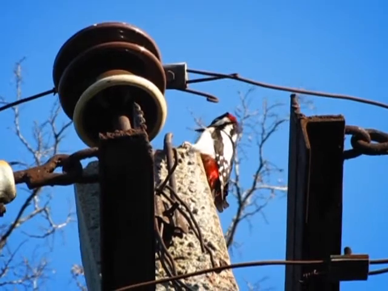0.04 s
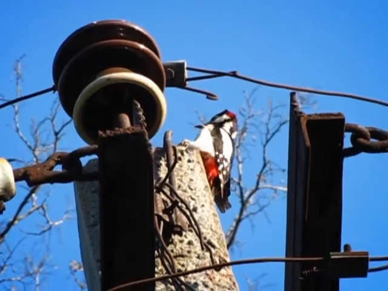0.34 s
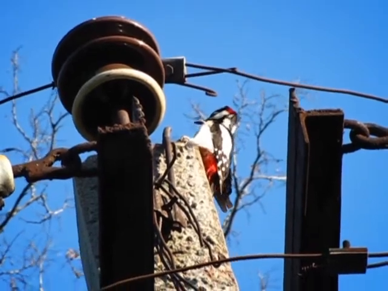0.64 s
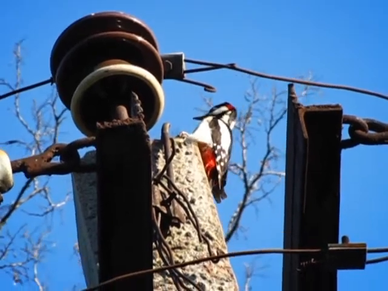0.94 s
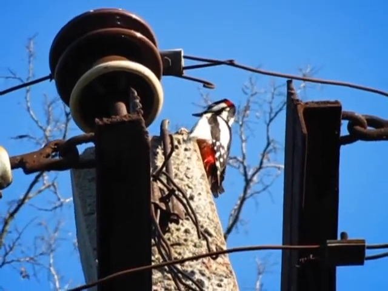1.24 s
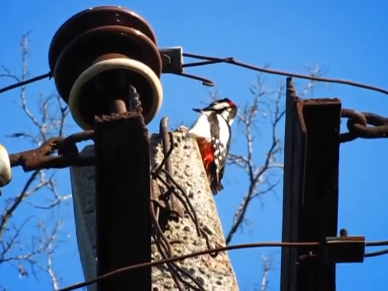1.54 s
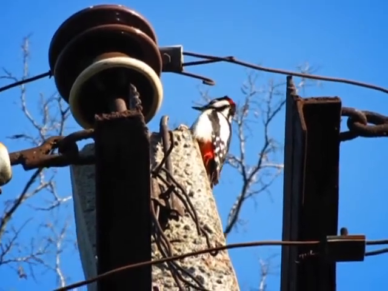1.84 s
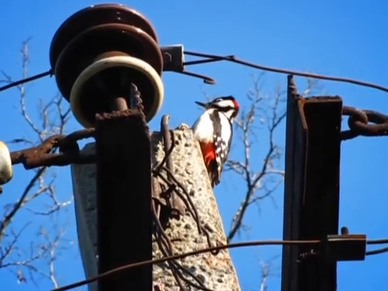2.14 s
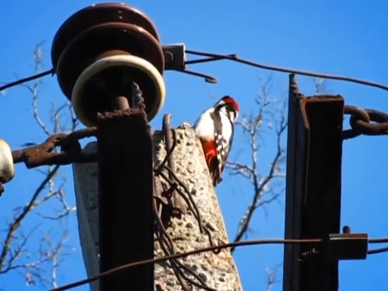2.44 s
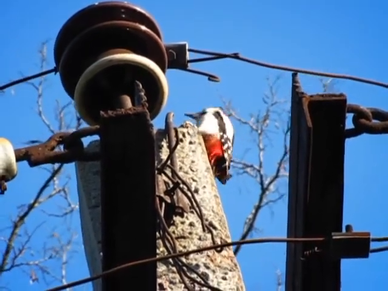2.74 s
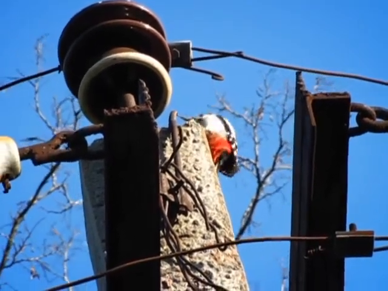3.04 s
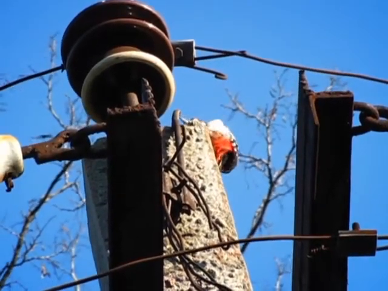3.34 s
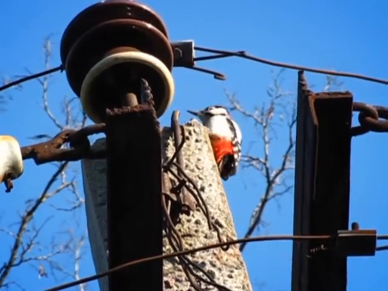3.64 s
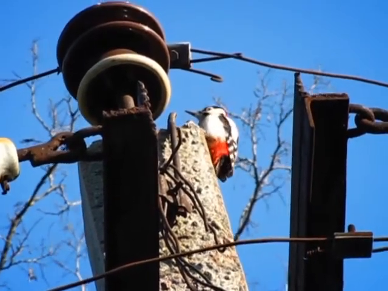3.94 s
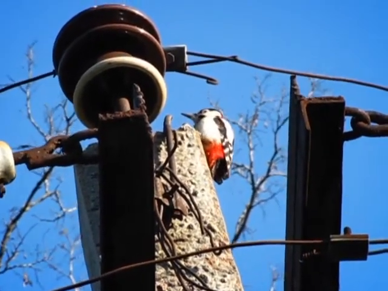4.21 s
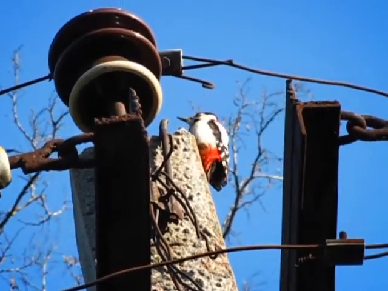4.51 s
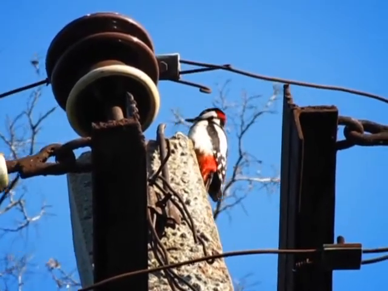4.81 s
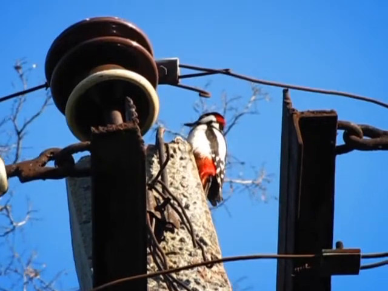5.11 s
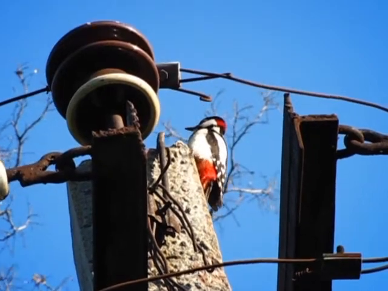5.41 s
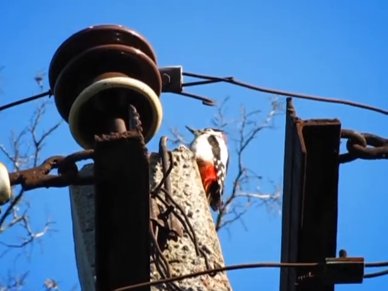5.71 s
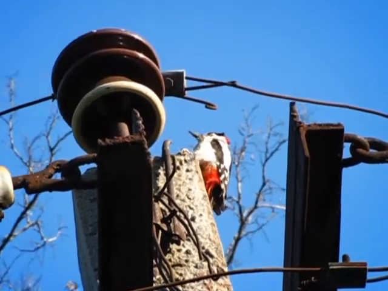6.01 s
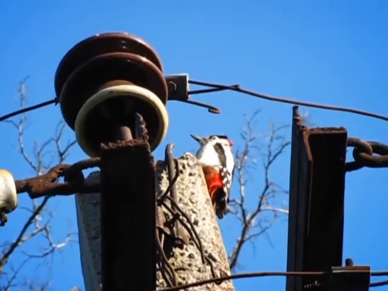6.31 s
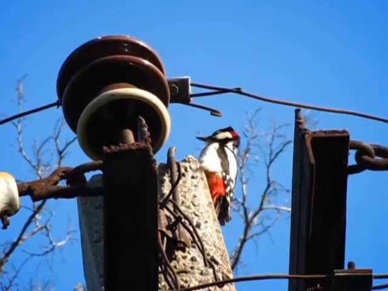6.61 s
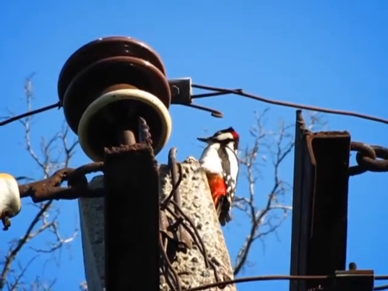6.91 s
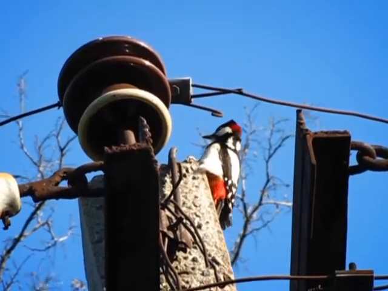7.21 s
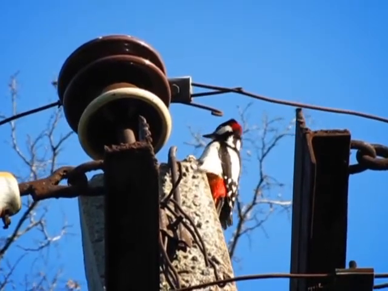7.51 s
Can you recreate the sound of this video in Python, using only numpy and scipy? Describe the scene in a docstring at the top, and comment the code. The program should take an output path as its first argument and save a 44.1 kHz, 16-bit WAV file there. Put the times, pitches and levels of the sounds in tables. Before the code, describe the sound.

Light wind rumbles on the microphone throughout, outdoors, over the low roar of distant traffic and faint, scattered chirps of far birds. From the start until about 2 seconds, a small bird on the right sings four quick phrases, roughly two a second, each made of two high, clear whistles and a short, higher buzz. At about 2.7 seconds, as the traffic swells, a woodpecker drums a single roll on the ironwork of a power-line pole, near the centre. The rapid blows make a dense, ringing metallic clatter that quickens and weakens, ending around 3.6 seconds. Faint hums rise from the fading traffic until about 4.3 seconds. Then the small bird sings five more of the same phrases, until about 6.5 seconds. The wind gusts harder during this song, with a brief low buffet at 4.8 seconds and another gust near 6.4. Wind, traffic and far chirps continue until nearly 8 seconds.

```python
"""Light wind rumbles on the microphone throughout, over distant traffic and the calls of far birds.
From the start a small bird on the right repeats two nearly pure whistles and a frequency-modulated buzz.
At 2.7 s, as the traffic swells, a woodpecker drums one quickening, weakening roll on the ironwork atop
a concrete power-line pole: each impact excites a dense clatter and the iron's ringing modes.
Faint drones rise from the fading traffic, and from 4.3 s the small bird sings again amid stronger gusts."""
import sys
import numpy as np
from scipy import signal
from scipy.fft import rfft, irfft
from scipy.io import wavfile
from scipy.ndimage import uniform_filter1d, map_coordinates

SR = 44100
rng = np.random.default_rng(int(sys.argv[2]) if len(sys.argv) > 2 else 0)


def transcribe(u):
    """Save the signal u as a 16-bit wav file named by the first command-line argument.

    u: samples, shape (n,) or (channels, n), limited to [-1, 1]; the rate is SR.
    q: integer samples, one column per channel.
    """
    v = np.clip(np.atleast_2d(u).T, -1, 1)
    q = np.round(v * 32767).astype(np.int16)
    wavfile.write(sys.argv[1], SR, q)


N = 341775
TIME = np.arange(N) / SR

def gain_of(db):
    """Amplitude ratio of a level in decibels."""
    return 10 ** (np.asarray(db) / 20)

def unit_rms(x):
    """Normalisation to unit mean power."""
    return x / np.sqrt(np.mean(x ** 2) + 1e-20)

def at_frequency(table, hz):
    """Interpolation on a logarithmic frequency axis."""
    table_hz, value = np.transpose(table)
    return np.interp(np.log(hz + 1), np.log(table_hz + 1), value)

def add(mix, start_s, sound):
    """Superposition of a sound on a mix, in place."""
    part = mix[max(round(start_s * SR), 0):][:len(sound)]
    part += sound[:len(part)]

def bell(t, centre, width):
    """Gaussian pulse: 1 at the centre, 1/e one width away."""
    return np.exp(-((t - centre) / width) ** 2)

def coloured(x, spectrum):
    """Spectral shaping by a table of levels, at unit rms."""
    size = x.shape[-1]
    response = gain_of(at_frequency(spectrum, np.fft.rfftfreq(size, 1 / SR)))
    return unit_rms(irfft(rfft(x) * response, size))

def noise_pair(size, correlation):
    """Partially correlated white noise at the two microphone ports."""
    a, b = rng.standard_normal((2, size))
    return np.array([a, correlation * a + np.sqrt(1 - correlation ** 2) * b])

def wander(size, hz):
    """Random fluctuation: low-pass noise of about unit rms."""
    span = max(size, SR // 2)
    rolloff = 1 + (np.fft.rfftfreq(span, 1 / SR) / hz) ** 4
    return unit_rms(irfft(rfft(rng.standard_normal(span)) / rolloff, span))[:size]

def panned(left_db):
    """Constant-power channel gains for a left-minus-right level difference."""
    pair = np.array([gain_of(left_db / 2), gain_of(-left_db / 2)]).reshape(2, -1)
    return pair / np.sqrt((pair ** 2).mean(0))

# Decay among the trees. Each row: frequency in Hz, reverberation time (T60) in seconds.
TREE_DECAY = [(500, 1), (2000, 0.99), (3700, 0.42), (5200, 0.33), (12000, 0.18)]

def tree_reverb(x, correlation, onset_s=0.0061):
    """Reverberation: scattering from trunks and walls leaves a tail that decays faster in the treble."""
    hz, t, bands = signal.stft(noise_pair(SR, correlation), SR, nperseg=256)
    decay = gain_of(-60 * t / at_frequency(TREE_DECAY, hz)[:, None])
    tail = signal.istft(bands * decay * np.minimum(t / onset_s, 1), SR, nperseg=256)[1]
    return signal.fftconvolve(np.atleast_2d(x), tail / np.linalg.norm(tail[0]), axes=1)[:, :N]

# The breeze between gusts. Each row: time in seconds, level in dB.
BREEZE_LEVELS = [(0, -32), (2.9, -34.5), (4.4, -35.5), (7.3, -37.5), (7.75, -42)]
# Gusts. Each row: peak time in seconds, half-width in seconds, level in dB, left minus right in dB.
WIND_GUSTS = [(0.144, 0.044, -27.5, -7), (.58, 0.26, -36, 17), (1.198, 0.13, -30, 16),
              (1.504, 0.1, -32, 16), (2.528, 0.19, -33.5, -34), (4.63, 0.055, -24.5, 12),
              (4.799, 0.034, -15, 0.5), (5.39, 0.091, -29, 18), (5.702, .09, -28.5, 12),
              (6.384, 0.19, -23, 15), (6.783, .24, -28.5, 22), (7.335, 0.087, -34, -20)]
# The wind's rumble. Each row: frequency in Hz, relative spectral density in dB.
WIND_SPECTRUM = [(8, -7.5), (25, -0.5), (45, -1), (65, 2.5), (90, -8), (125, -13.5), (170, -21.5),
                 (300, -35), (800, -53.5), (3000, -99.5)]

def wind(flutter_db=1.3, ceiling=0.5):
    """Turbulent pressure buffets the two ports unequally; the strongest gust saturates softly."""
    flutter = flutter_db * np.array([wander(N, hz=5), wander(N, hz=3.6)])
    breeze_db = np.interp(TIME, *np.transpose(BREEZE_LEVELS)) + flutter
    power = (gain_of(breeze_db) * panned(left_db=3)) ** 2
    for peak_s, width_s, db, left_db in WIND_GUSTS:
        power += (gain_of(db) * panned(left_db)) ** 2 * bell(TIME, peak_s, width_s)
    eddies = coloured(noise_pair(N, correlation=0.59), WIND_SPECTRUM)
    return ceiling * np.tanh(np.sqrt(power) * eddies / ceiling)

# Vehicles. Each row: closest approach in seconds, time to half power in seconds, relative level in dB.
VEHICLE_PASSES = [(.7, 1, -46.5), (3.25, 0.8, -35.5), (6.501, 0.76, -45.5), (7.7, 0.28, -42)]

def road_level(steady_db=-45, steepness=3.18):
    """Incoherent sources add in power: passing vehicles over a steady roar, as a relative level in dB."""
    passing = sum(gain_of(db) ** 2 / (1 + abs((TIME - nearest_s) / half_s) ** steepness)
                  for nearest_s, half_s, db in VEHICLE_PASSES)
    return 10 * np.log10(gain_of(steady_db) ** 2 + passing)

# The far road's roar and the air's hiss. Each row: frequency in Hz, relative spectral density in dB.
ROAR_SPECTRUM = [(60, 7), (150, -2.5), (300, 2), (500, 0.5), (900, -1), (1100, -7.5), (1400, -17.5),
                 (2000, -29.5), (4000, -30.5), (9000, -62)]
AIR_SPECTRUM = [(100, -3.5), (1500, 2), (3000, -1.5), (5000, -3.5), (8000, -10.5), (11000, -13.5),
                (15000, -21)]

def traffic(roar_db=1, tyres_db=-17, brightening=1.65, hiss_db=-60, lag_samples=4):
    """Broadband road noise, slightly left: the tyres' treble grows faster than the roar, over air hiss."""
    road_db = road_level()
    peak_db = road_db.max()
    level_db = road_db + 0.5 * wander(N, hz=7.9)
    roar = coloured(noise_pair(N, correlation=0.87), ROAR_SPECTRUM)
    left, right = gain_of(level_db + roar_db) * roar * panned(left_db=1.2)
    tyre_spectrum = [(400, -26), (1100, -12), (1600, -8.5), (2500, -16), (6000, -21), (15000, -35.5)]
    tyres = coloured(noise_pair(N, correlation=0.26), tyre_spectrum)
    tyres *= gain_of(peak_db + tyres_db + brightening * (level_db - peak_db))
    hiss = gain_of(hiss_db) * coloured(noise_pair(N, correlation=0.067), AIR_SPECTRUM)
    return np.array([left, np.roll(right, lag_samples)]) + tyres + hiss

# Hums in the traffic. Each row: start in seconds, duration in seconds, frequency in Hz, peak level in dB.
TRAFFIC_DRONES = [(3.548, 0.58, 777, -44), (3.647, 0.71, 409, -47), (7.441, 0.37, 337, -46.5)]

def drones(waver_hz=25):
    """Narrow-band noise: random amplitude and phase turn a tone into a wavering hum."""
    hums = np.zeros(N)
    for start_s, length_s, hz, db in TRAFFIC_DRONES:
        t = np.arange(0, length_s, 1 / SR)
        waver = wander(len(t), waver_hz) + 1j * wander(len(t), waver_hz)
        hum = unit_rms((waver * np.exp(2j * np.pi * hz * t)).real)
        add(hums, start_s, gain_of(db) * np.hanning(len(t)) * hum)
    return hums

def faint_chirps(count=12, length_s=0.062, low_hz=2380, high_hz=4030, fall=0.31, db=-61, roughness=0.35):
    """Downward frequency sweeps at random times and pitches, as rows like those of DISTANT_CALLS."""
    offset, height = rng.random((count, 2)).T
    starts = (np.arange(count) + offset) / count * TIME[-1]
    pitches = low_hz + (high_hz - low_hz) * height
    return [(s, length_s, hz, hz * (1 - fall), db, roughness) for s, hz in zip(starts, pitches)]

# The clearest far calls. Each row: start in seconds, duration in seconds, first and last pitch in Hz,
# level in dB, roughness from 0 to 1.
DISTANT_CALLS = [(0.843, .086, 2730, 2396, -54, 1), (2.172, 0.065, 6620, 4550, -57, 0.66),
                 (2.237, .21, 3850, 4430, -59, 0.23), (3.662, 0.13, 4120, 4250, -59, 0.1),
                 (3.775, 0.048, 4410, 2560, -52, 0.7), (4.144, 0.031, 2765, 2710, -52.5, 0.2),
                 (4.823, 0.073, 2210, 2360, -52.5, 0.8), (5.491, 0.031, 2840, 3010, -55, 0),
                 (6.867, 0.063, 4920, 2110, -53.5, .4), (7.157, .033, 2890, 2480, -56.5, 0.4),
                 (7.449, 0.077, 4670, 3010, -52.5, .5)]

def far_birds(jitter=0.14, reverb_db=-3):
    """Glides roughened by random frequency modulation and blurred by reverberation."""
    calls = np.zeros(N)
    for start_s, length_s, first_hz, last_hz, db, roughness in DISTANT_CALLS + faint_chirps():
        size = int(length_s * SR)
        pitch = np.linspace(first_hz, last_hz, size) * (1 + jitter * roughness * wander(size, hz=503))
        phase = 2 * np.pi * np.cumsum(pitch) / SR
        add(calls, start_s, gain_of(db) * signal.windows.tukey(size, 0.5) * np.sin(phase))
    return calls + gain_of(reverb_db) * tree_reverb(calls, correlation=0.39)

def whistle(db, hz, length_s):
    """A tick, a raspy lead-in, then a flip at t = 0 to a weakly harmonic tone. Returns (start, sound)."""
    tick_before_s, tick_width_s, tick_hz, tick_db = 0.021, 0.0035, 4850, -21.5
    lead_s, lead_glide_hz, lead_db, rasp_jitter = 0.012, [3400, 2967], -14, 0.03
    flip_s, overshoot_hz, settle_s, sag_hz_per_s, jitter = 0.0025, 330, 0.0057, 560, 0.0065
    attack_s, hold_s, fade_db_per_s, release_s = 0.0031, 0.031, 220, 0.0094
    t = np.arange(-tick_before_s - 2 * tick_width_s, length_s + 0.03, 1 / SR)
    age = np.maximum(t, 0)
    voiced = np.clip((t + lead_s) / flip_s + 1, 0, 1)
    flipped = np.clip(t / flip_s + 1, 0, 1)

    lead_hz = np.interp(t, [-lead_s, -flip_s], lead_glide_hz)
    note_hz = hz + overshoot_hz * np.exp(-age / settle_s) - sag_hz_per_s * (age - hold_s)
    pitch = np.where(voiced > 0, lead_hz + flipped * (note_hz - lead_hz), tick_hz)
    pitch *= 1 + (jitter + rasp_jitter * (1 - flipped)) * wander(len(t), hz=503)
    phase = 2 * np.pi * np.cumsum(pitch) / SR
    harmonics_db = [0, -19 - 19 * flipped, -45, -57]  # the octave is stronger in the lead-in
    tone = sum(gain_of(level) * np.sin(k * phase) for k, level in enumerate(harmonics_db, 1))

    swell = gain_of(lead_db) * voiced + (1 - gain_of(lead_db)) * (1 - np.exp(-age / attack_s))
    fade = gain_of(-fade_db_per_s * np.maximum(t - hold_s, 0))
    release = bell(np.maximum(t - length_s + release_s, 0), 0, release_s)
    tick = gain_of(tick_db) * bell(t, -tick_before_s, tick_width_s)
    return t[0], gain_of(db) * (swell * fade * release + tick) * tone

def buzz(db, hz, trill_hz=240, swing_hz=170, rough_hz=60, depth=0.57, scoop_hz=260, scoop_s=0.0117):
    """Rapid frequency and amplitude modulation spread sidebands about a high, upward-scooping note."""
    t = np.arange(0, 0.075, 1 / SR)
    trill = 2 * np.pi * np.cumsum(trill_hz * (1 + 0.057 * wander(len(t), hz=80))) / SR
    carrier_hz = hz - scoop_hz * np.exp(-t / scoop_s)
    pitch = carrier_hz + swing_hz * np.sin(trill) + rough_hz * wander(len(t), hz=500)
    phase = 2 * np.pi * np.cumsum(pitch) / SR
    envelope = np.interp(t, [0, 0.016, 0.05, t[-1]], [0.2, 0.7, 0.32, 0.14])
    envelope *= signal.windows.tukey(len(t), 0.18) * (1 + depth * np.cos(trill))
    return gain_of(db) * envelope * (np.sin(phase) + gain_of(-38) * np.sin(2 * phase))

# Two songs, each a list of phrases. Each row: first whistle's onset in seconds, interval to the second
# in seconds, relative level in dB, whistle pitch in Hz.
SONG_PHRASES = [
    [(.138, 0.17, -23.5, 3600), (.62, 0.16, -22, 3648), (1.087, 0.17, -21, 3660),
     (1.557, .167, -19.5, 3667)],
    [(4.254, .170, -20.5, 3642), (4.733, 0.16, -21.5, 3632), (5.191, .163, -21, 3630),
     (5.663, 0.17, -22, 3631), (6.142, 0.16, -21, 3624)],
]

def phrases(whistle_db=-2.5, stray_hz=12, soft_start_db=-6, warm_up_s=0.15):
    """Repetition of whistle, whistle, buzz, each song opening softly. Returns (whistles, buzzes)."""
    first_length_s, second_length_s, second_db = 0.052, 0.039, -1
    buzz_db, buzz_after_s, buzz_hz, climb_hz_per_s = -4.5, 0.087, 5098, 98.3
    whistles, buzzes = np.zeros((2, N))
    for song in SONG_PHRASES:
        opening_s = song[0][0]
        for start_s, gap_s, db, hz in song:
            notes = [(start_s, first_length_s, 0), (start_s + gap_s, second_length_s, second_db)]
            for onset_s, length_s, accent_db in notes:
                effort_db = db + accent_db + soft_start_db * np.exp((opening_s - onset_s) / warm_up_s)
                pitch = hz + stray_hz * rng.standard_normal()
                offset_s, note = whistle(whistle_db + effort_db, pitch, length_s)
                add(whistles, onset_s + offset_s, note)
            buzz_pitch = buzz_hz + climb_hz_per_s * (start_s - opening_s)
            add(buzzes, start_s + gap_s + buzz_after_s, buzz(db + buzz_db, buzz_pitch))
    return whistles, buzzes

# Echoes from near surfaces. Each row: delay in seconds, level relative to the direct sound in dB.
EARLY_REFLECTIONS = [(.009, -7), (.024, -10), (.041, -17.5)]

def songbird(whistle_reverb_db=-10.5, buzz_reverb_db=-7, port_lag_s=0.000286):
    """Level and arrival-time differences place the song on the right; reflections interfere with it."""
    whistles, buzzes = phrases()
    direct = whistles * panned(left_db=-10.5) + buzzes * panned(left_db=-4.5)
    song = direct.copy()
    for delay_s, db in EARLY_REFLECTIONS:
        emitted_s = TIME - delay_s - 0.0001 * wander(N, hz=1.5)  # the bird shifts on its twig
        song += gain_of(db) * np.array([map_coordinates(side, [emitted_s * SR]) for side in direct])
    song[0] = map_coordinates(song[0], [(TIME - port_lag_s) * SR])
    scattered = gain_of(whistle_reverb_db) * whistles + gain_of(buzz_reverb_db) * buzzes
    return song + tree_reverb(scattered, correlation=0.033)

# The bill's force, which tires and gives one late push. Each row: time in seconds, relative level in dB.
BILL_FORCE = [(2.723, -3.5), (2.79, 1), (2.92, -1), (3.0, -4.5), (3.12, -5), (3.22, -11), (3.305, -13),
              (3.345, -11), (3.55, -19.5)]

def roll(start_s=2.723, count=22, first_gap_s=0.05205, last_gap_s=0.03291, settle_blows=6.75):
    """An impulse train whose gaps shrink exponentially to a limit. Returns times and strengths in dB."""
    gaps = last_gap_s + (first_gap_s - last_gap_s) * np.exp(-np.arange(count - 1) / settle_blows)
    times = start_s + np.append(0, np.cumsum(gaps))
    return times, np.interp(times, *np.transpose(BILL_FORCE)) + 0.3 * rng.standard_normal(count)

# Ringing modes of the iron. Each row: frequency in Hz, relative rms level over the roll in dB.
IRON_MODES = [(532, -43.5), (1129, -43.5), (1249, -45), (1460, -42.5), (1475, -37.5), (1733, -44.5),
              (1826, -38.5), (1856, -56), (1962, -43.5), (1984, -35), (2243, -54), (2373, -47), (2515, -51),
              (2711, -51), (2733, -61), (2960, -66), (3101, -74), (3300, -52.5), (3631, -48.5), (4400, -55),
              (4570, -52), (4759, -50.5), (4979, -49), (5160, -61), (5360, -64), (5490, -58), (5740, -61),
              (5950, -46.5), (6470, -60)]

def ringing(times, strengths_db, bass_t60=0.54, build_s=0.0018, scatter_rad=1.52, port_spread_rad=0.48):
    """Modal resonance: each blow feeds damped modes; soft blows touch longer and excite less treble."""
    t = np.arange(times[0], times[-1] + 1, 1 / SR)
    age = np.arange(SR // 2) / SR
    blow_samples = np.round((times - times[0]) * SR).astype(int)
    ring = np.zeros((2, len(t)))
    for hz, db in IRON_MODES:
        force_exponent = np.interp(hz, [2000, 5000], [0.81, 1.46])
        phases = scatter_rad * rng.standard_normal(len(times))
        kicks = np.zeros(len(t), complex)
        kicks[blow_samples] = gain_of(force_exponent * strengths_db) * np.exp(1j * phases)
        t60 = bass_t60 * min(1, (2000 / hz) ** 0.53)
        envelope = gain_of(-60 * age / t60) * (1 - np.exp(-age / build_s))
        mode = signal.fftconvolve(kicks, envelope)[:len(t)] * np.exp(2j * np.pi * (hz * t + rng.random()))
        ports = np.exp(1j * port_spread_rad * rng.standard_normal((2, 1)))  # each mode radiates its own way
        ring += gain_of(db) * unit_rms((mode * ports).real)
    return ring * np.sqrt(len(t) / SR / (times[-1] - times[0]))

# The iron's dense, quickly damped modes. Each row: frequency in Hz, relative spectral density in dB.
CLATTER_SPECTRUM = [(250, -46), (520, -7), (950, -3), (1350, -5), (1640, -4.5), (1900, 0.5), (2450, 0),
                    (3600, -9), (3950, -10), (4600, -7), (6100, -7), (6900, -13), (11500, -21),
                    (13000, -31), (15000, -36)]

def clatter(swell_s=0.011, hold_s=0.022, body_t60=0.18, treble_t60=0.085, tail_db=-15, tail_t60=0.3):
    """Impulse response: flexural waves build up in the iron, then drain into the pole, treble first."""
    crowd_db, crowd_width_hz, spot_db, crossover_hz = 6, 40, 4, 4200
    t = np.arange(SR // 2) / SR
    hz = np.fft.rfftfreq(len(t), 1 / SR)
    # Energy gathers about the ringing modes, and each spot struck favours other bands.
    crowding = np.max([1 / (1 + ((hz - mode_hz) / crowd_width_hz) ** 2) for mode_hz, _ in IRON_MODES], 0)
    spot = unit_rms(uniform_filter1d(rng.standard_normal(len(hz)), size=350))
    spectrum = rfft(noise_pair(len(t), correlation=0.91)) * gain_of(crowd_db * crowding + spot_db * spot)
    waves = coloured(irfft(spectrum, len(t)), CLATTER_SPECTRUM)
    body = irfft(rfft(waves) / (1 + (hz / crossover_hz) ** 6), len(t))
    treble = waves - body
    age = np.maximum(t - hold_s, 0)
    body_decay = np.hypot(gain_of(-60 * age / body_t60), gain_of(tail_db - 60 * t / tail_t60))
    swell = np.minimum(0.45 + 0.55 * t / swell_s, 1)
    return swell * (body * body_decay + treble * gain_of(-60 * age / treble_t60))

def woodpecker(clatter_db=-21.5, variation=0.66, ring_db=-3, reverb_db=-10):
    """Impact excitation: the clatter of successive blows superposes on the ringing of the iron."""
    impulses, ring, varied = np.zeros(N), np.zeros((2, N)), np.zeros((2, N))
    times, strengths_db = roll()
    for blow_s, db in zip(times, strengths_db):
        add(impulses, blow_s, gain_of([db]))
        for channel, sound in zip(varied, clatter()):  # the bill never lands on quite the same spot
            add(channel, blow_s, gain_of(db) * sound)
    repeated = signal.fftconvolve(impulses[None], clatter(), axes=1)[:, :N]
    drumming = variation * varied + np.sqrt(1 - variation ** 2) * repeated
    drumming *= gain_of(clatter_db) * panned(left_db=1)
    for channel, sound in zip(ring, ringing(times, strengths_db)):
        add(channel, times[0], sound)
    ring *= gain_of(ring_db) * panned(left_db=4)
    return drumming + ring + gain_of(reverb_db) * tree_reverb(drumming, correlation=1)

def scene():
    """Linear superposition of the birds and the outdoor background."""
    return woodpecker() + songbird() + far_birds() + traffic() + drones() + wind()

def record(dry, cutoff_hz=15700):
    """Band limiting by a linear-phase low-pass filter."""
    lowpass = signal.firwin(511, cutoff_hz, window=("kaiser", 9), fs=SR)
    return signal.oaconvolve(dry, lowpass[None], "same")

dry = scene()
out = record(dry)
transcribe(out)
```